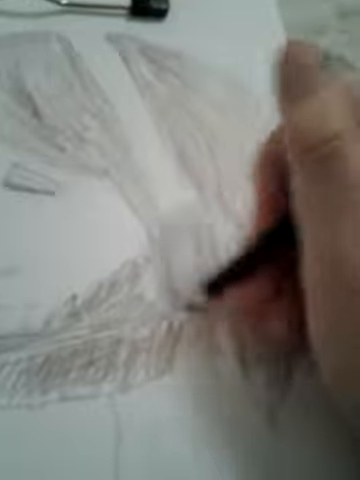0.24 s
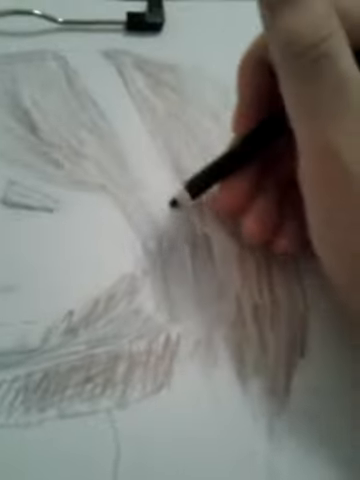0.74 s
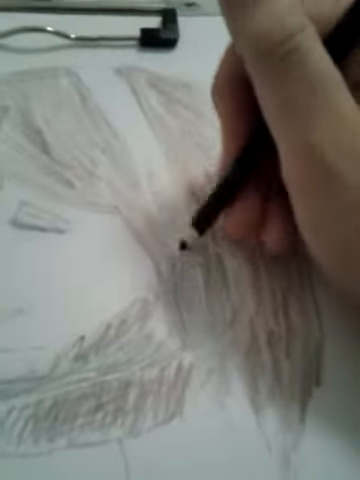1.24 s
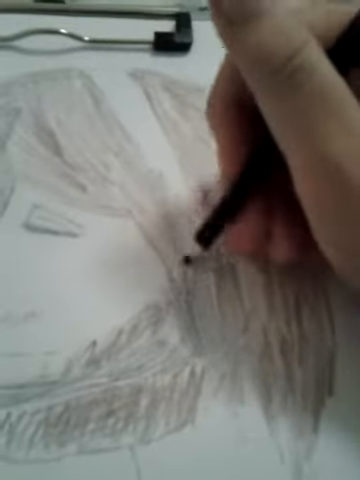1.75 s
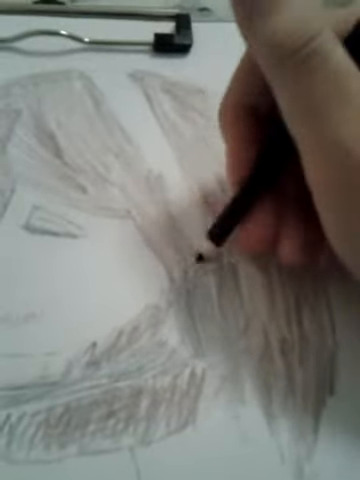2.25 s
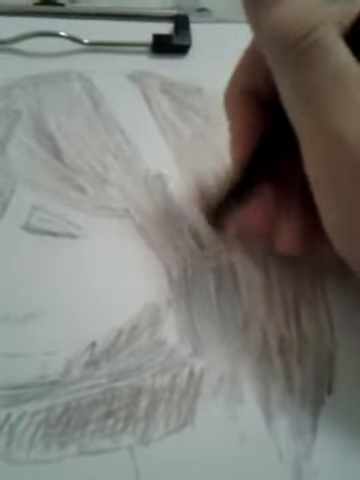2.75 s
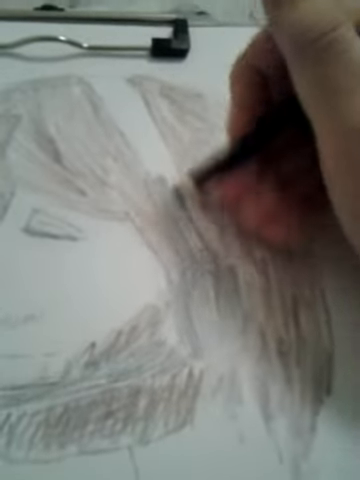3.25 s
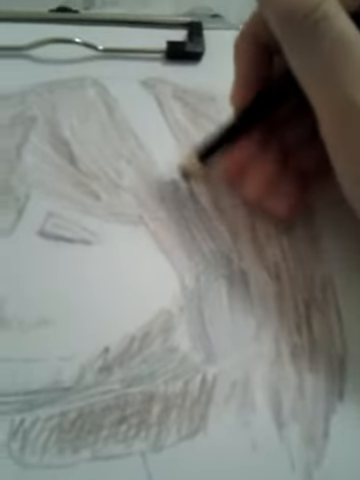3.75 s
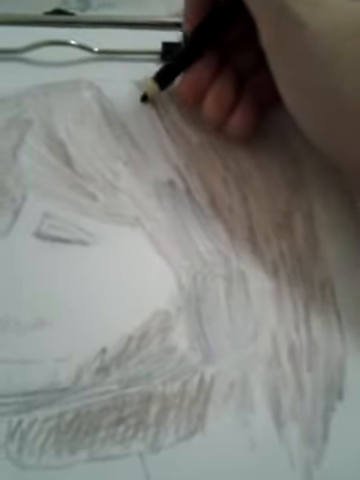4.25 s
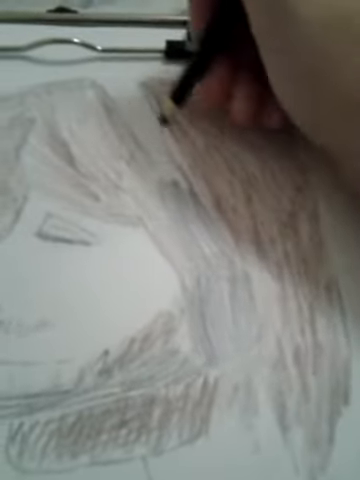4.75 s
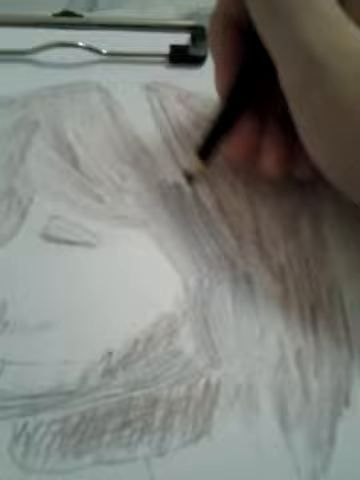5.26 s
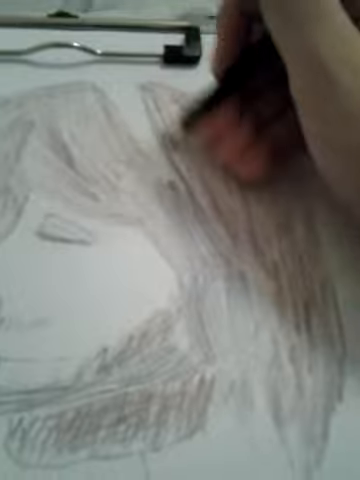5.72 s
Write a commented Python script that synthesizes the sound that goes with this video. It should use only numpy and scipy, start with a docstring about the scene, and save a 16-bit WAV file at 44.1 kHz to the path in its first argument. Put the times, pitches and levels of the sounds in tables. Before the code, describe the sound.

Quick pencil shading, roughly eight strokes a second, each a swelling and fading bright hiss with a duller woody rasp beneath. Tiny crisp snags catch now and then. The strokes stop briefly twice, early and about two thirds through, leaving soft skin-on-paper brushing and faint, wavering fan noise. Close, mono, with only a short room tail.

```python
"""Quick pencil shading, about eight strokes a second, hisses and rasps close to a mono microphone.
The lead catches on the paper's fibres: one friction noise gives a bright hiss from the tip
and a duller rasp from the clipboard. Coarse fibres add short snags.
The side of the hand brushes over the sheet, louder between runs, and once knocks the board softly.
A fan, a rush of noise with wavering tones, hums faintly in the small room, which adds a short tail."""
import sys
import numpy as np
from scipy import signal
from scipy.fft import rfft, irfft, next_fast_len
from scipy.io import wavfile
from scipy.ndimage import uniform_filter1d, map_coordinates

SR = 44100
rng = np.random.default_rng(int(sys.argv[2]) if len(sys.argv) > 2 else 0)


def put_to_file(sound):
    """Save the sound as 16-bit audio at rate SR, in the file named by the first command-line argument."""
    columns = np.atleast_2d(sound).T  # one column per channel
    safe = np.clip(columns, -1, 1)
    whole_steps = np.round(safe * 32767)
    wavfile.write(sys.argv[1], SR, whole_steps.astype(np.int16))


N = 264159
TIME = np.arange(N) / SR


def amp(db):
    """Decibels to gain."""
    return 10 ** (np.asarray(db) / 20)


def unit(x):
    """Scale x to an rms of 1."""
    return x / np.sqrt(np.mean(x ** 2) + 1e-20)


def read(rows, at):
    """Read (position, value) rows with straight lines between them."""
    return np.interp(at, *np.transpose(rows))


def along(points, hz):
    """Read (Hz, value) points on a log frequency axis."""
    point_hz, values = np.transpose(points)
    return np.interp(np.log(hz + 1), np.log(point_hz + 1), values)


def wobble(rate):
    """A smooth random curve with this many knots a second."""
    knots = rng.standard_normal(int(N * rate / SR) + 4)
    return map_coordinates(knots, [TIME * rate])


def filtered(x, response):
    """Multiply the spectrum of x by a response that is a function of frequency."""
    size = next_fast_len(N + 8192)
    hz = np.fft.rfftfreq(size, 1 / SR)
    return irfft(rfft(x, size) * response(hz), size)[..., :N]


def coloured(x, spectrum):
    """Shape x with a spectrum that keeps the power of white noise."""
    return filtered(x, lambda hz: unit(amp(along(spectrum, hz))))


def friction(catch_rate, catch_share, clump_db, clump_rate):
    """Smooth rubbing plus fibres letting go one by one, clumped by the paper's tooth; rms 1."""
    lets_go = rng.random(N) < catch_rate / SR
    catches = unit(lets_go * rng.standard_normal(N))
    smooth = rng.standard_normal(N)
    # catch_share is a share of the power
    rub = np.sqrt(1 - catch_share) * smooth + np.sqrt(catch_share) * catches
    return unit(rub * amp(clump_db * wobble(clump_rate)))


def motion(lean_db):
    """Tip gain, board gain and tip position (-1 to 1): the lead speeds up, slows and turns round."""
    # Strokes, to and fro in turn, each lasting until the next turn or lift.
    # Each row: start in seconds, relative strength in dB.
    strokes = [(-0.058, -41.2), (0.044, -45), (0.184, -42.0), (0.314, -44), (0.443, -45.8), (0.569, -47.6),
               (0.956, -47.5), (1.068, -47), (1.185, -44), (1.31, -44), (1.422, -46), (1.55, -47),
               (1.674, -46.3), (1.806, -47.1), (1.931, -45), (2.067, -43.5), (2.177, -44), (2.307, -43.5),
               (2.414, -44), (2.537, -44.5), (2.65, -44), (2.77, -44.5), (2.875, -44.5), (2.996, -45.2),
               (3.103, -44.4), (3.22, -45), (3.332, -45), (3.438, -44.5), (3.556, -47.3), (3.66, -46.5),
               (3.774, -49.0), (3.868, -46), (4.755, -45.5), (4.89, -47.4), (4.996, -44), (5.133, -45.5),
               (5.244, -42.5), (5.377, -45), (5.494, -45), (5.625, -47.0), (5.771, -47.2), (5.894, -47.5)]
    # Moments when the pencil leaves the paper, in seconds.
    lifts = [0.655, 3.976, 6.027]
    # The hand favours one end of its swing. Each row: time in seconds,
    # share of a stroke added to the speeding-up one way and taken off it the other way.
    lopsided = [(.6, -.176), (1.0, 0.024), (2.4, 0.056), (3.0, -0.025), (3.9, -0.078), (4.8, -0.06)]
    # How strongly the board answers under this part of the sheet.
    # Each row: time in seconds, level relative to the tip in dB, before the lean.
    board_share = [(.23, -11.5), (.4, -14), (1.0, -10), (1.7, -6), (2.2, -9.5), (3.4, -9), (3.8, -12.5),
                   (4.8, -14), (5.9, -10)]
    overrun_s = 0.0027  # the lead still rubs as it turns round
    speed_power = 1.59  # loudness grows as speed to this power
    rise_share = 0.42  # share of a stroke spent speeding up, before the lopsidedness

    tip, position = np.zeros((2, N))
    turns = [start for start, _ in strokes] + list(lifts)
    for k, (start, db) in enumerate(strokes):
        end = min(s for s in turns if s > start)
        direction = (-1) ** k
        rise = np.clip(rise_share + direction * read(lopsided, start), 0, 1)
        fastest = start + (end - start) * rise
        marks = [start - overrun_s, fastest, end + overrun_s]
        inside = (TIME > marks[0]) & (TIME < marks[-1])
        phase = np.pi * np.interp(TIME[inside], marks, [0, .5, 1])
        speed = np.abs(np.sin(phase))
        tip[inside] += amp(db) * speed ** speed_power
        position[inside] = direction * np.cos(phase)
    # the board answers more strongly at one end of the stroke
    board = tip * amp(read(board_share, TIME) + lean_db * position)
    return tip, board, position


def snags(decay, level_db):
    """The lead snags on coarse fibres; each lets go in a very short burst of dying noise."""
    # Each row: time in seconds, relative strength in dB.
    snag_rows = [(0.6017, -24), (2.0844, -24), (2.2578, -20.5), (2.3368, -25), (2.7144, -25), (2.9364, -26),
                 (3.913, -24), (4.799, -23), (5.2884, -29)]
    out = np.zeros(N + SR)
    t = np.arange(SR // 50) / SR
    for start, db in snag_rows:
        first = round(start * SR)
        fade = amp(db + level_db - 60 * t / decay)  # falls 60 dB in decay seconds
        out[first:first + len(t)] += fade * rng.standard_normal(len(t))
    return out[:N]


def moving_peaks(x, position, ring_db, ring_width_hz, upper_hz, rest_db):
    """The tip rings at a drifting pitch; an upper peak and the bounce off the sheet glide with its travel."""
    # The tip's ring drifts as the grip shifts. Each row: time in seconds, pitch in Hz.
    ring_pitch = [(.5, 8950), (1.1, 8850), (1.8, 8900), (2.1, 8430), (3.55, 8400), (3.9, 8770), (5.3, 8960)]
    bounce_db, bounce_s = 1.7, .00057  # ripple depth, mean delay in seconds
    # relative change of the delay along a stroke and with the grip
    bounce_swing, bounce_wander = 0.017, 0.028

    hz, t, z = signal.stft(x, SR, nperseg=256, noverlap=192)
    hz = hz[:, None]

    def peak(at, width):
        return np.exp(-.5 * ((hz - at) / width) ** 2)

    ring = ring_db * peak(read(ring_pitch, t), ring_width_hz)
    glide_hz = upper_hz + 1250 * np.interp(t, TIME, position)
    glide = 6 * peak(glide_hz, 650)
    # the hiss bounces off the sheet and ripples the spectrum
    delay = bounce_s * (1 - bounce_swing * position + bounce_wander * wobble(10))
    bounce = bounce_db * np.cos(2 * np.pi * hz * np.interp(t, TIME, delay))
    # a fixed term offsets the gliding peak around its middle
    rest = rest_db * peak(upper_hz, 840)
    gain_db = ring + glide + bounce + rest
    return signal.istft(z * amp(gain_db), SR, nperseg=256, noverlap=192)[1][:N]


def on_page(x, colours):
    """Blend the colours for a hand low, midway and high on the page."""
    # Where the hand is. Each row: time in seconds, place (0 low, 1 midway, 2 high).
    hand_place = [(0, 0), (.68, 0), (1.0, 1), (3.5, 1), (4.75, 2)]
    place = read(hand_place, TIME)
    blend = np.zeros(N)
    for k, colour in enumerate(colours):
        nearness = np.clip(1 - np.abs(place - k), 0, 1)
        blend += nearness * coloured(x, colour)
    return blend


def pencil():
    """The same friction hisses at the tip and shakes the board."""
    # Hiss of the tip with the hand low, midway and high on the page.
    # Each row: frequency in Hz, relative level in dB per Hz.
    tip_low = [(3000, -45), (4550, -21), (6300, -34), (7300, -14), (7800, -6), (8400, -0.5), (8800, -1.5),
               (9400, 1.5), (10700, -11), (11300, -10), (12600, -10), (13050, -16), (13700, -10),
               (15500, -16)]
    tip_mid = [(3000, -33), (6300, -30.5), (7150, -14.5), (7700, -12.5), (8300, -1.5), (9200, -4.5),
               (10050, -12), (10700, -11.5), (11350, -13), (11950, -8), (12800, -11), (13600, -16),
               (14700, -20.5), (15600, -15.5)]
    tip_high = [(3000, -37), (6700, -24.5), (7900, -9), (8600, 0), (9000, -5), (9500, 2), (10300, -15.5),
                (10900, -12), (11700, -10.5), (12400, -7), (12900, -6), (13400, -19), (14600, -20),
                (15500, -16.5)]
    # Paper on its board under the lead, low to mid-page and up near the clamp.
    # Each row: frequency in Hz, relative level in dB per Hz.
    board_mid = [(150, -36), (450, -5), (980, -12), (1180, 0.5), (1450, 1.5), (2100, -7), (2650, -18),
                 (3100, -2), (3550, -9.5), (4000, -15.5), (4550, -7.5), (5000, -16.5), (5450, -11.5),
                 (7000, -27)]
    board_high = [(150, -28), (450, -3.5), (950, -6), (1300, 1), (2000, -3.5), (2650, -13.5), (3300, -4),
                  (4050, -18), (4600, -9), (5000, -17), (5500, -13), (7000, -23)]

    tip_gain, board_gain, position = motion(lean_db=3.0)
    grit = friction(catch_rate=4000, catch_share=.25, clump_db=1.2, clump_rate=400)
    # the pressure of the fingers trembles within each stroke
    scrape = grit * amp(0.95 * wobble(80))
    tip_drive = tip_gain * scrape + snags(decay=.012, level_db=-13)
    ringing = moving_peaks(tip_drive, position, ring_db=3.5, ring_width_hz=270,
                           upper_hz=11900, rest_db=-3.5)
    hiss = on_page(ringing, [tip_low, tip_mid, tip_high])
    # the board's answer wavers on its own
    board_drive = board_gain * scrape * amp(1.4 * wobble(45))
    rasp = on_page(board_drive, [board_mid, board_mid, board_high])
    return amp(-1.43) * hiss + amp(1.3) * rasp


def sliding():
    """Gain of the hand's rub: faint during a run of strokes, louder where the hand shifts."""
    # The hand shifts on the sheet, swelling and fading. Each row: fastest moment in seconds,
    # level in dB, rise in dB per second, fall in dB per second.
    shifts = [(.28, -49, 4, 24), (.69, -51, 120, 80), (.87, -51, 38, 114), (4.07, -56, 29, 20)]
    resting_db = -63.5  # the hand rubs along while the pencil is shading

    tip_gain = motion(lean_db=0)[0]
    # smoothed over 50 ms
    shading = np.abs(uniform_filter1d(1.0 * (tip_gain > 0), SR // 20))
    layers = [amp(resting_db) * shading]
    for fastest, db, rise, fall in shifts:
        drop_db = np.maximum(rise * (fastest - TIME), fall * (TIME - fastest))
        layers.append(amp(db - drop_db))
    return np.max(layers, axis=0)


def hand():
    """The side of the hand brushes over the sheet: friction coloured by skin on paper."""
    # Skin on paper. Each row: frequency in Hz, relative level in dB per Hz.
    skin = [(300, -23.5), (1250, -6), (1900, -5.5), (2600, -12), (3300, -8.5), (4700, -13.5), (6600, -15),
            (8100, -2), (9100, 1.5), (10200, -7), (10900, -4.5), (11700, -10.5), (12600, -7), (15000, -17)]
    rub = friction(catch_rate=4000, catch_share=0.21, clump_db=0.9, clump_rate=150)
    return sliding() * coloured(rub, skin)


def fan():
    """A rush of coloured noise, barely wavering, with a few tones that waver in level and phase."""
    # Room air and fan. Each row: frequency in Hz, relative level in dB per Hz.
    air = [(25, -23), (55, -27.5), (125, -14.5), (185, -13.5), (250, -4.5), (430, -4.5), (580, 4),
           (700, -3), (950, -5), (1280, -13.5), (2000, -6), (2800, -13.5), (5800, -25.5), (15000, -18.5)]
    # Fan tones. Each row: frequency in Hz, relative rms level in dB.
    hum = [(269, -81.5), (312, -76), (576, -69.5), (807.5, -72.5), (899, -78), (929, -81), (2192, -78.5)]
    rush = amp(.5 * wobble(5)) * coloured(rng.standard_normal(N), air)
    tones = np.zeros(N)
    for hz, db in hum:
        level = amp(db + 2.5 * wobble(6)) * np.sqrt(2)
        tones += level * np.sin(2 * np.pi * hz * TIME + 1.03 * wobble(12))
    return amp(-56.5) * rush + amp(-0.5) * tones


def knock(at):
    """The board gives a soft, hollow knock under the hand: decaying modes with a gentle onset."""
    # Modes of the board. Each row: frequency in Hz, level before the onset in dB,
    # time to fall 60 dB in seconds.
    modes = [(386, -50, 0.17), (440, -45.5, 0.14), (494, -46, 0.13)]
    t = np.maximum(TIME - at, 0)
    ring = np.zeros(N)
    for hz, db, t60 in modes:
        ring += amp(db - 60 * t / t60) * np.sin(2 * np.pi * hz * t)
    onset = 1 - np.exp(-t / 0.0091)
    return onset * ring


def room(x):
    """A short tail of decaying noise that dies sooner in the top treble."""
    # Each row: frequency in Hz, time to fall 60 dB in seconds.
    decay_times = [(200, 0.38), (2000, 0.42), (12000, 0.053)]
    hz, t, z = signal.stft(rng.standard_normal(SR // 2), SR, nperseg=256)
    fade = amp(-60 * t / along(decay_times, hz)[:, None])
    tail = signal.istft(z * fade, SR, nperseg=256)[1]
    return signal.fftconvolve(x, tail / np.linalg.norm(tail))[:N]


def scene():
    """Pencil, hand and knock with their room tail, plus the fan, alike in both channels."""
    near = pencil() + hand() + knock(at=.208)
    mono = near + amp(-12.5) * room(near) + fan()
    return np.array([mono, mono])


def record(dry):
    """The recorder keeps nothing above its band limit."""
    top_hz = 15850
    return filtered(dry, lambda hz: hz < top_hz)


dry = scene()
out = record(dry)
put_to_file(out)
```